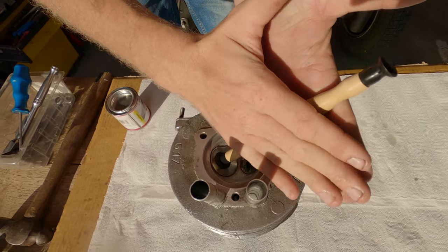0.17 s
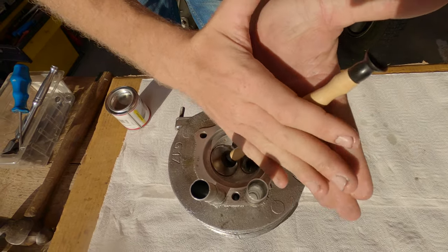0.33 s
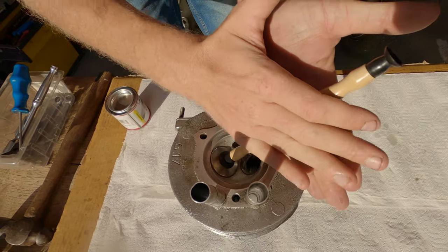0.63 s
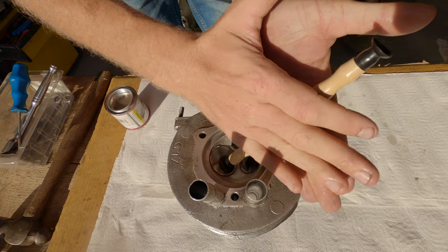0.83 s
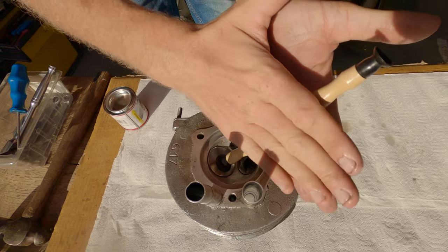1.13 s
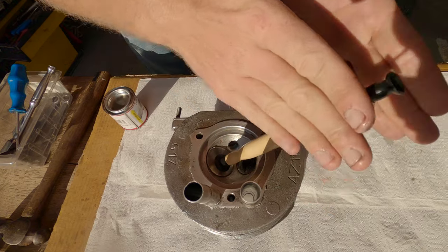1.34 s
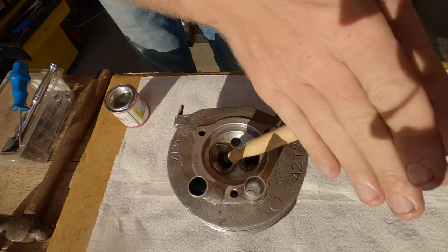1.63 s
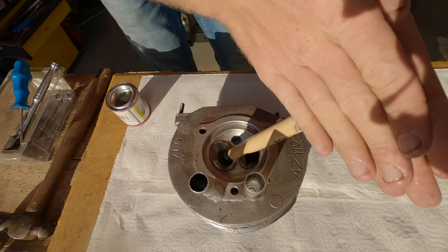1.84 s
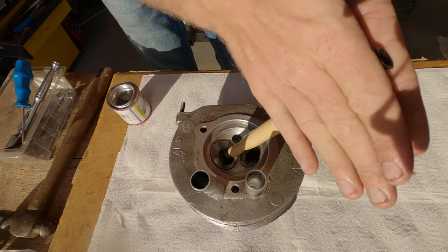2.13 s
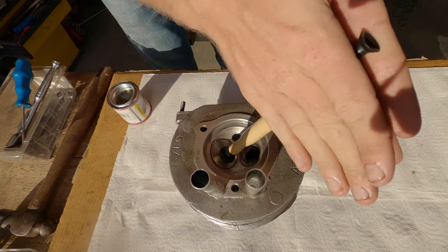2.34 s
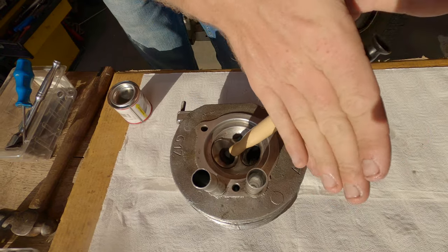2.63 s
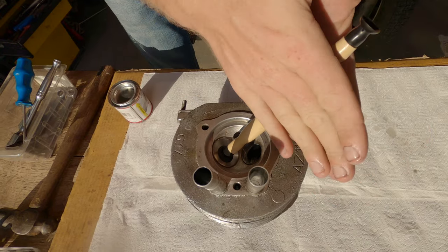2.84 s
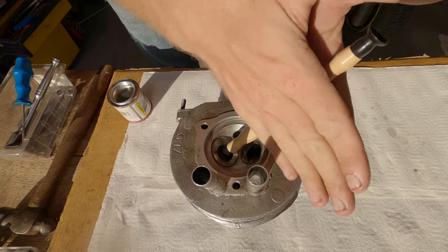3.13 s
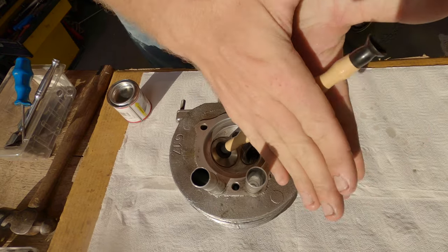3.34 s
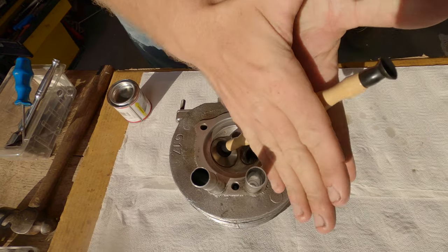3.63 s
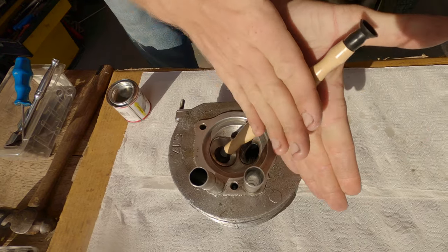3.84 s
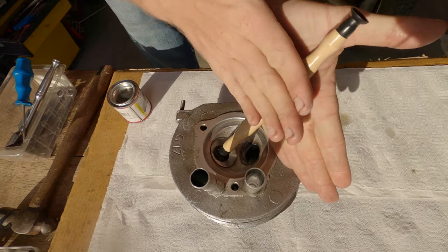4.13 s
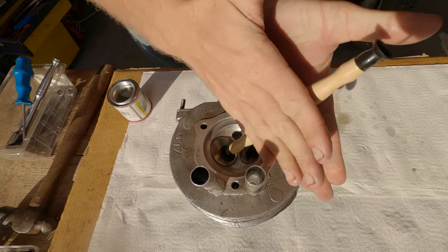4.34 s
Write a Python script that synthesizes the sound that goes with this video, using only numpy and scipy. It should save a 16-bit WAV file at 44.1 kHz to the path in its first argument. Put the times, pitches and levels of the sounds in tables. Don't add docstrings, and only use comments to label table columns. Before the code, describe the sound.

Close-up hand lapping of metal on metal: brief crunchy rasps with ringing overtones and a hollow, mid-pitched honk. It starts lightly, falls to tiny irregular ticks and a pause, stutters through several short catches, then settles into steady alternating strokes, about seven a second, pressed harder and harder until the end. A faint low motor hum fills the short-reverb workshop throughout.

```python
import sys
import numpy as np
from scipy import signal
from scipy.fft import rfft, irfft
from scipy.io import wavfile
from scipy.ndimage import uniform_filter1d

SR = 44100
rng = np.random.default_rng(int(sys.argv[2]) if len(sys.argv) > 2 else 0)


def bounce(signal):
    frames = np.transpose(np.atleast_2d(signal))
    limited = np.clip(frames, -1, 1)
    pcm = np.round(limited * 32767).astype(np.int16)
    wavfile.write(sys.argv[1], SR, pcm)


def voltage_ratio(level):
    return 10 ** (np.asarray(level, float) / 20)


N = 197423
PORT_HZ = 722.0
GRIT_SPLIT_HZ = 4300


def unit(x):
    return x / np.sqrt(np.mean(x ** 2))


def ring(x, hz, width_hz):
    return signal.lfilter(*signal.iirpeak(hz, hz / width_hz, fs=SR), x)


def colour(x, table):
    hz, db = np.transpose(table)
    f = np.fft.rfftfreq(len(x), 1 / SR) + 1
    gain = voltage_ratio(np.interp(np.log(f), np.log(hz), db))
    return irfft(rfft(x) * gain, len(x))


def follow(table):
    return voltage_ratio(np.interp(np.arange(N) / SR, *np.transpose(table)))


def walk(rate):
    hold = int(SR / rate)
    levels = np.repeat(rng.standard_normal(N // hold + 1), hold)
    slewed = uniform_filter1d(uniform_filter1d(levels, hold), hold)
    return unit(slewed[:N])


def grit(spread_db, patchy_db, patch_rate):
    sizes = np.minimum(rng.exponential(size=N), 6)
    grains = rng.standard_normal(N) * voltage_ratio(spread_db * sizes)
    return unit(grains * voltage_ratio(patchy_db * walk(patch_rate)))


# (start [s], length [s], fine grit peak [dB], place of the peak [0-1],
# port drive over fine grit [dB])
TURNING_STROKES = [(-.03, 0.17, -54, 0, 24), (.148, 0.15, -57, 0.32, 25.5), (0.294, 0.13, -53.5, 0.21, 24),
                   (1.764, 0.075, -57, .28, 26), (1.93, 0.058, -59, 0.49, 20), (2.0, .1, -50, 0.24, 22),
                   (2.107, 0.032, -50.5, 0.25, 7), (2.256, 0.17, -52.5, 0.44, 24.5),
                   (2.554, 0.18, -47.5, 0.38, 23), (2.739, 0.075, -49, .3, 18),
                   (2.82, 0.093, -46, .25, 10.5), (2.915, .16, -45.5, 0.5, 21.5),
                   (3.073, 0.17, -44.5, 0.54, 15.5), (3.24, .15, -43, 0.4, 19.5),
                   (3.384, 0.15, -45.5, 0.52, 18), (3.533, .13, -42, 0.38, 20.5),
                   (3.663, 0.15, -43.5, 0.54, 16), (3.814, 0.13, -43, 0.46, 21),
                   (3.964, 0.16, -44.5, 0.31, 20.5), (4.117, 0.13, -42.5, 0.48, 18),
                   (4.259, 0.17, -46, 0.35, 21), (4.422, .14, -44, 0.54, 20.5)]
# (time [s], peak level [dB], port drive over it [dB])
SEAT_TICKS = [(0.537, -61, 22), (0.591, -65.5, 23), (0.608, -57, 15), (0.644, -69, 23), (0.671, -64, 16),
              (0.711, -68.5, 5), (0.764, -65.5, 31), (0.787, -63, 28), (0.861, -60, 24), (0.886, -58.5, 22),
              (1.036, -71.5, 34.5), (1.062, -64, 16), (1.152, -72, 28.5), (1.7231, -63.5, 30.5),
              (1.88, -62.5, 21.5), (2.5163, -75, 27)]
# (time [s], coarse over fine grit [dB])
PALM_PRESSURE = [
    (0, -3),
    (.45, -2),
    (1.7, -6.5),
    (2.4, -3),
    (2.7, -2.5),
    (3.1, -1.5),
    (3.6, -0.5),
    (4.476, -0.5),
]
SPEED_UP_POWER = [0.64, 0.35, 0.67]
SLOW_DOWN_POWER = [1.44, 1, 1.45]


def effort():
    tick_fade_s, tick_coarse_db = 0.0093, 1.6
    drag_db, drag_s = -24, 0.051
    t, force = np.arange(N) / SR, np.zeros((3, N))
    up, down = np.array(SPEED_UP_POWER)[:, None], np.array(SLOW_DOWN_POWER)[:, None]
    for start, length, db, top, port_db in TURNING_STROKES:
        cut = slice(max(int(start * SR), 0), int((start + length) * SR) + 8000)
        age = (t[cut] - start) / length
        rise = np.clip(age / top, 0, 1)
        fall = np.clip((1 - age) / (1 - top), 0, 1)
        speed = np.sin(np.pi / 2 * rise) ** up * np.sin(np.pi / 2 * fall) ** down
        overrun = np.clip(age - 1, 0, None) * length
        speed[2] += voltage_ratio(drag_db) * rise * np.exp(-overrun / drag_s)
        force[:, cut] += voltage_ratio(db + np.array([[0], [port_db], [0]])) * speed
    for start, db, port_db in SEAT_TICKS:
        fade = np.exp(-np.clip(t - start, 0, 1) / tick_fade_s) * (t >= start)
        force += voltage_ratio(db + np.array([[0], [port_db], [tick_coarse_db]])) * fade
    force[2] *= follow(PALM_PRESSURE)
    return uniform_filter1d(force, size=64, axis=1)


CASTING_MODE_HZ = [915, 1034, 1216, 1795, 1993, 2067, 2197, 2237, 2333, 2511, 2672, 3100, 3350, 3720, 4082,
                   4258, 4403, 4570, 5150, 5710, 6330, 6880, 7312, 7580, 8080, 8600, 9350, 9610, 10220,
                   11000]
# (width [Hz], level [dB])
CASTING_MODE_RING = [(53, 15), (37.4, 15), (77.5, 12), (29.4, 15.5), (23.5, 17.5), (16.8, 19), (48.3, 14),
                     (12, 22.5), (15.1, 15), (32.407, 17.5), (49.4, 15), (116, 8.5), (30.4, 16.5),
                     (45, 12.5), (27, 13), (12.7, 12.5), (16.9, 8), (120, 8.5), (48, 4), (99, 4.5),
                     (50, 3.5), (188, 12.5), (20.37, 11), (64, 8.5), (86, 8.5), (203, 8.5), (180, 1),
                     (63, -23), (54, 2), (330, -1)]


def casting_modes(low, high):
    out = np.zeros(N)
    sign = 1
    for hz, (width_hz, db) in zip(CASTING_MODE_HZ, CASTING_MODE_RING):
        feed = low if hz < GRIT_SPLIT_HZ else high
        out += sign * ring(feed * voltage_ratio(db + 2.6 * walk(9)), hz, width_hz)
        sign = -sign
    return out


# (time [s], level [dB])
HEAD_FREEDOM = [
    (0, -2.5),
    (.5, 0.5),
    (1.7, -0.5),
    (2.1, 2.5),
    (2.4, 5.5),
    (2.75, 4.5),
    (2.95, -6.5),
    (3.6, -6),
    (4.476, -11),
]
HEAD_MODE_HZ = [7010, 9420]
# (width [Hz], level [dB])
HEAD_MODE_RING = [(160, 5.8), (200, 12.3)]


def valve_head(high):
    sung = high * follow(HEAD_FREEDOM)
    modes = zip(HEAD_MODE_HZ, HEAD_MODE_RING)
    return sum(voltage_ratio(db) * ring(sung, hz, width_hz) for hz, (width_hz, db) in modes)


# (frequency [Hz], level [dB])
RASP_COLOUR = [(300, -1.5), (600, 23), (1100, 1), (1430, 1), (1700, 13), (2200, 10.5), (2900, 4),
               (4000, -4.5), (5500, -2), (7200, 0), (9000, 3), (10000, 1), (12000, -5.5), (15600, -14.5)]


def rasp(fine, coarse):
    direct_db, inner_db, inner_t60_s = -4.5, -3.0, 0.089
    split = signal.butter(2, GRIT_SPLIT_HZ, fs=SR, output="sos")

    def crushed(grains):
        lows = signal.sosfilt(split, (coarse - fine) * grains)
        return colour(lows + fine * grains, RASP_COLOUR)

    direct = crushed(grit(2.83, 2.2, 120))
    inner = crushed(grit(2.4, 1.44, 100))
    rung = signal.fftconvolve(inner, tail(inner_t60_s, 0))[:N]
    return voltage_ratio(direct_db) * direct + voltage_ratio(inner_db) * rung


# (time of peak [s], peak level [dB], pitch [Hz], fade [s])
TRIAL_SHUDDERS = [(.0325, -35.5, 708.5, .008), (.042, -39.5, 723.7, 0.022), (.0852, -48, 705, 0.012),
                  (.1606, -32, 685, 0.01), (.1917, -37, 726.3, 0.006), (.2145, -34, 713, .008),
                  (.2533, -47, 739, 0.0051), (.3205, -30.5, 706, 0.0065), (.3346, -36.5, 706, 0.0072),
                  (.348, -32.5, 714, .011), (.3805, -41, 692, .01), (.63, -48.5, 735, .014),
                  (.659, -48, 700, 0.01), (.6733, -49, 723, .008), (.685, -51.5, 722, 0.022),
                  (.7896, -53, 704, 0.0046), (.8637, -43, 733, .02), (.8956, -44, 718, 0.023),
                  (1.7832, -30, 722, 0.0067), (1.7942, -28, 718.8, 0.006), (1.9642, -35.5, 714.7, 0.0087),
                  (2.0212, -22.5, 713.4, .006), (2.0411, -27.5, 703, .004), (2.0611, -27.5, 714, 0.014),
                  (2.1246, -29, 733.8, .011), (2.315, -32, 709.4, 0.0076), (2.3242, -27.5, 696.3, .006),
                  (2.3466, -32, 720, .005), (2.391, -40, 711.3, 0.0039), (2.4024, -40.5, 722, .01)]
# (time of peak [s], peak level [dB], pitch [Hz], fade [s])
LAPPING_SHUDDERS = [(2.6037, -27, 721, .009), (2.6189, -29, 706, .015), (2.698, -31, 704, .014),
                    (2.7804, -31, 719, 0.022), (2.8472, -27, 716, .015), (2.999, -24.5, 732, 0.011),
                    (3.0363, -25, 726, .013), (3.1022, -28.5, 713, .016), (3.185, -28, 710, 0.024),
                    (3.2786, -23, 732, 0.0054), (3.3017, -23.5, 727, .0065), (3.3177, -20.5, 722, 0.0098),
                    (3.3558, -23, 730, .012), (3.4613, -22.5, 727, 0.015), (3.0835, -26.5, 691, 0.0052),
                    (3.5899, -26.5, 720, 0.014), (3.624, -26, 720, 0.0039), (3.6407, -22.5, 710, 0.011),
                    (3.7303, -24.5, 711, 0.01), (3.3984, -28.5, 715.6, .007), (3.8441, -24, 711.3, .02),
                    (3.5455, -24, 722, 0.012), (3.9097, -20.5, 730, 0.0039), (4.014, -19, 714, 0.018),
                    (4.1291, -24.5, 719.7, .005), (4.048, -28.5, 724, .0075), (4.1634, -26.5, 715, 0.0043),
                    (4.1951, -20.5, 730, 0.018), (4.323, -30, 735, .013), (3.999, -22.5, 710.4, 0.022)]


def snags():
    rise_s = 0.01037
    break_s, break_db, break_fade_s = 0.01278, 14, 0.0066
    slip_turns = 0.1972
    t, swell = np.arange(N) / SR, np.zeros(N)
    breaks = [(start + break_s, db + break_db, PORT_HZ, break_fade_s)
              for start, _, db, _, _ in TURNING_STROKES[1:]]
    rows = sorted(list(TRIAL_SHUDDERS) + list(LAPPING_SHUDDERS) + breaks)
    for peak, db, _, fade in rows:
        cut = slice(max(int((peak - rise_s) * SR), 0), int(peak * SR) + 4000)
        age = t[cut] - peak
        pump = np.abs(np.cos(np.pi / 2 * np.clip(age / rise_s, -1, 0))) ** 0.88
        decay = np.exp(-np.clip(age, 0, 1) / max(fade, 0.002))
        bump = np.where(age < 0, pump, decay)
        swell[cut] = np.maximum(swell[cut], voltage_ratio(db) * bump)
    peaks, _, hz, _ = np.transpose(rows)
    latest = np.clip(np.searchsorted(peaks - rise_s / 2, t) - 1, 0, None)
    slip = np.cumsum(slip_turns * rng.standard_normal(len(peaks)))
    turns = uniform_filter1d(np.cumsum(hz[latest]) / SR + slip[latest], size=120)
    return uniform_filter1d(swell, size=60) * np.sin(2 * np.pi * turns)


def hollow_port(drive):
    narrow = ring(drive, PORT_HZ, 27.5)
    return voltage_ratio(16.5) * ring(narrow, PORT_HZ, 246.0)


def bench(drive):
    hz, width_hz = 467, 230.0
    return voltage_ratio(-4) * ring(ring(drive, hz, width_hz), hz, width_hz)


def valve():
    fine, port, coarse = effort()
    high = fine * grit(1.5, 2.7, 150)
    low = coarse * grit(2.13, 3.0, 90)
    drive = port * grit(1.45, 0.84, 60)
    metal = casting_modes(low, high) + valve_head(high) + rasp(fine, coarse)
    return metal + hollow_port(drive) + bench(drive) + snags()


def tail(t60, gap):
    age = np.arange(SR // 2) / SR
    shape = rng.standard_normal(len(age)) * np.exp(-np.log(1000) * age / t60) * (age >= gap)
    return shape / np.sqrt(np.sum(shape ** 2))


# (frequency [Hz], level per Hz [dB])
SHOP_AIR = [(15, -32), (25, -32), (37, -18.5), (70, -12), (91, -17.5), (129, -5.5), (297, -23.5),
            (323, -18.5), (400, -20.5), (538, -22), (921, -32), (999, -34), (15600, -55)]


def shop():
    air = colour(rng.standard_normal(N), SHOP_AIR)
    hum = ring(air, 150, 70.0)
    waver = voltage_ratio(1.7 * walk(6.0)) - 1
    motor = voltage_ratio(2.5) * ring(air, 171.8, 22.0)
    return voltage_ratio(-59.5) * unit(air + motor + hum * waver)


def scene():
    room_t60_s, room_db = 0.22, -13
    near = valve()
    wet = signal.fftconvolve(near, tail(room_t60_s, 0.006))[:N]
    return (near + voltage_ratio(room_db) * wet + shop())[None]


def roll_off(x):
    return signal.sosfilt(signal.butter(12, 15710, fs=SR, output="sos"), x)


def record(dry):
    return roll_off(dry)


dry = scene()
out = record(dry)
bounce(out)
```